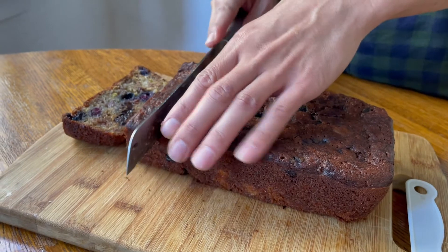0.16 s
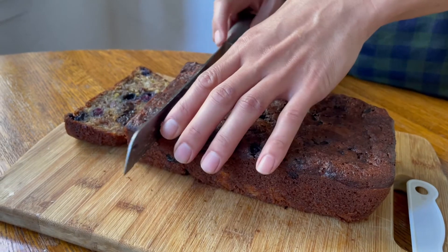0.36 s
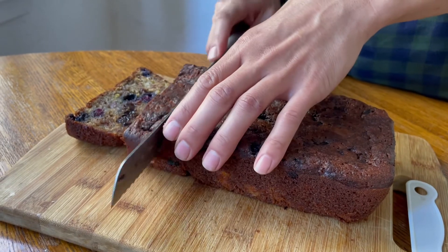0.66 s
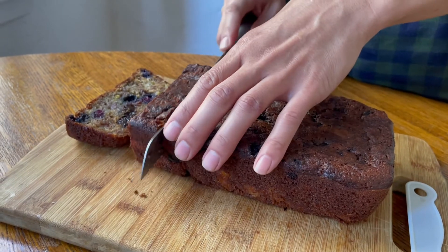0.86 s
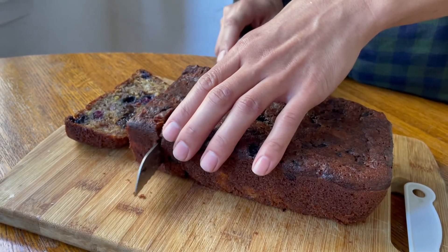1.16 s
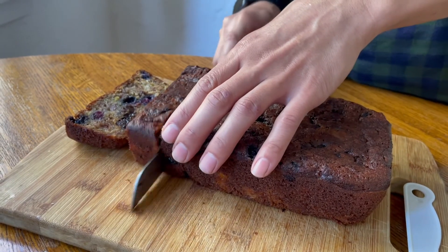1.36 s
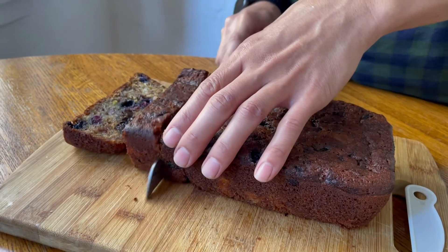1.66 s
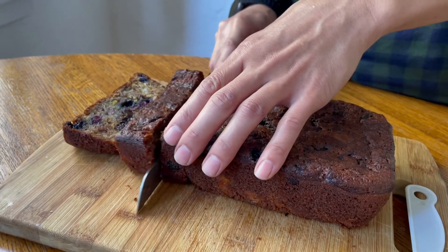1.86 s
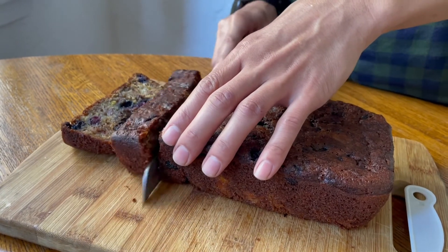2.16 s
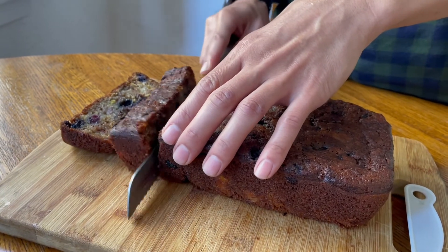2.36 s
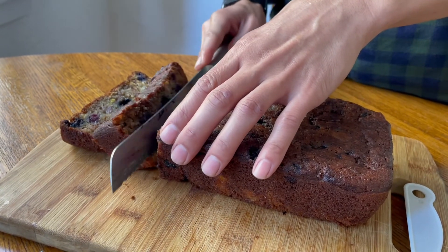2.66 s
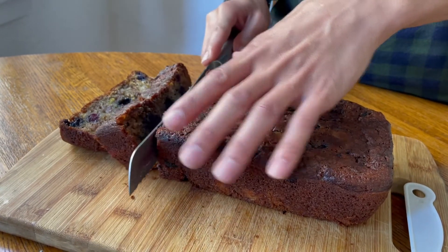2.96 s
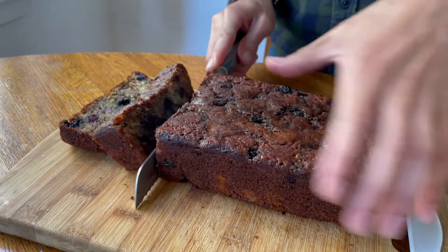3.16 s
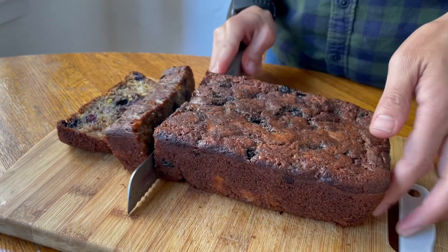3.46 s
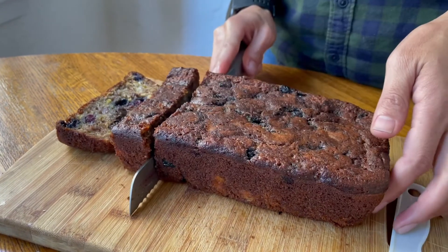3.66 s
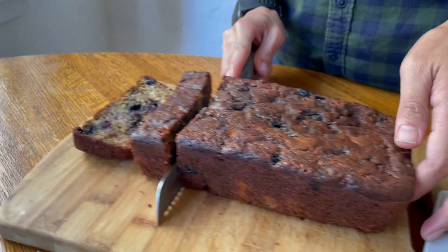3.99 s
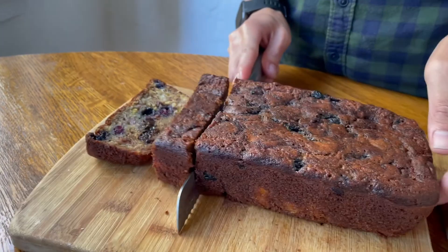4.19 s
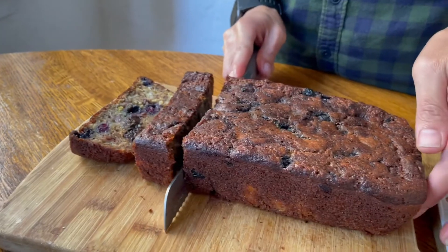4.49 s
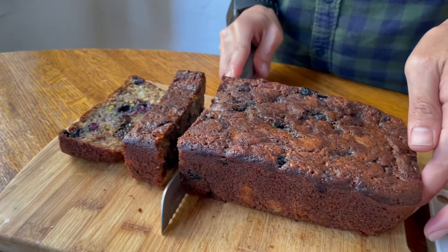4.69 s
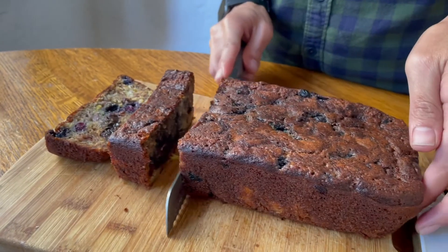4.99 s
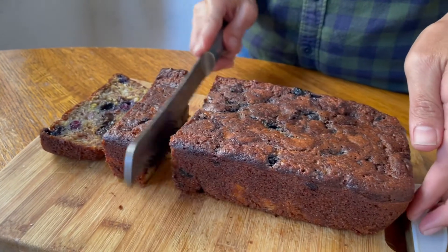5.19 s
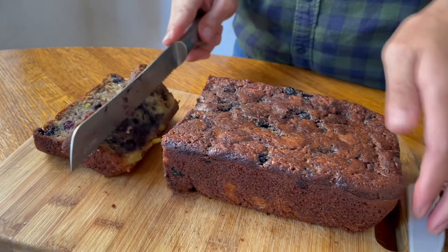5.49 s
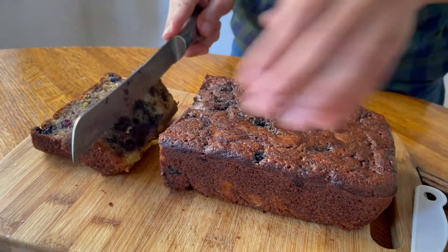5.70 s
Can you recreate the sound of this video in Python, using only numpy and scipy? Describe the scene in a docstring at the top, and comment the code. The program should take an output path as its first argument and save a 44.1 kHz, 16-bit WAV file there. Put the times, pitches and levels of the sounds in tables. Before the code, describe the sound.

Quiet crumbly sawing grows into gritty wood rasps, a brief lull, then a loud knock, juddering board scrapes and small clicks indoors.

```python
"""A serrated knife saws through a moist loaf down to a wooden board, which knocks and is then dragged over a table.
Random slips of teeth and crumbs make hiss and fizz, rasp in the overtones and drum the board modes; a squeal sings.
Knocks ring the board under a thud and a crack; ticks are short wavering rings, bumps low decaying tones.
A slice rocks on the blade, the table rumbles, feedback delays give the room, and air noise and hum lie below."""
import sys
import numpy as np
from scipy import signal
from scipy.fft import rfft, irfft, next_fast_len
from scipy.io import wavfile
from scipy.ndimage import uniform_filter1d

SR = 44100
rng = np.random.default_rng(int(sys.argv[2]) if len(sys.argv) > 2 else 0)


def store_wav(level_fs):
    """Save 16-bit WAV to argv[1]."""
    pcm = np.round(np.clip(np.atleast_2d(level_fs), -1, 1) * 32767)
    wavfile.write(sys.argv[1], SR, pcm.T.astype(np.int16))


N = 257527
PAD = next_fast_len(N + SR)
HZ = np.maximum(np.arange(PAD // 2 + 1) * SR / PAD, 1)   # FFT grid

# Modes of the wooden board. Each row: pitch in Hz, decay t60 in s, then relative levels in dB
# under the knife, when dragged, when knocked, when it judders round.
BOARD = [(197.8, 0.26, -11, -1.5, -24, 4.5), (248.7, 0.22, 4, 3, -0.5, 6.5),
         (291.2, 0.17, -8, -2.5, -11.5, -5.5), (349.65, 0.035, -7.5, 0.5, -6, -11),
         (391, 0.17, -6.5, -8.5, -23.5, -15.5), (422.5, 0.16, -8, -4.5, -4.5, 1),
         (483, 0.062, -7, -17, -7.5, -23), (547, 0.065, 2, -7, -0.5, -6), (562, 0.047, -5.5, -2, 8.5, -4),
         (585, 0.081, -14, -13, -2, -4), (636.6, 0.11, -14.5, -8.5, -5, -0.5),
         (706.5, 0.17, -11, -7.5, -3.5, -8), (767.7, 0.13, -11.5, -5.5, -6.5, -6.5),
         (841.7, 0.13, -13, -8.5, -3, -10.5), (918, 0.09, -25, -13, -6, -19),
         (992, 0.14, -25.5, -9.5, -6, -19.5), (1106, 0.09, -25, -14.5, -2, -15)]


def amp(db):
    """Decibels to gain."""
    return 10 ** (np.asarray(db) / 20)


def rms_one(x):
    """Scale to rms 1."""
    return x / np.sqrt(np.mean(x ** 2) + 1e-20)


def on_hz(points, axis=1):
    """One column of a frequency table, interpolated over log frequency on the FFT grid."""
    table = np.array(points)
    return np.interp(np.log(HZ), np.log(table[:, 0]), table[:, axis])


def shaped(x, response):
    """Filter by a frequency response."""
    return irfft(rfft(x, PAD) * response, PAD)[..., :N]


def drift(rate_hz):
    """Slow random wander of rms 1: low-passed noise on every hundredth sample, joined by lines."""
    pole = np.exp(-200 * np.pi * rate_hz / SR)
    slow = signal.lfilter([1], [1, -pole], rng.standard_normal(N // 100 + 402))[400:]
    return np.interp(np.arange(N) / 100, np.arange(len(slow)), rms_one(slow))


def swells(events, shapes):
    """One gain in time for each level column: every event swells to its peak and sinks again."""
    t = np.arange(N) / SR
    gains = np.full((len(shapes), N), 1e-7)
    for peak_s, rise_s, fall_s, *levels_db in events:
        away = np.where(t < peak_s, (peak_s - t) / rise_s, (t - peak_s) / fall_s)
        near = away < 5
        for gain, level_db, (end_db, blunt) in zip(gains, levels_db, shapes):
            gain[near] += amp(level_db - end_db * away[near] ** blunt)
    return gains


def add(out, s, sound, pan_db):
    """Place a short sound in both channels; positive pan leans left."""
    i = round(s * SR)
    out[:, i:i + len(sound)] += (sound * amp([[pan_db / 2], [-pan_db / 2]]))[:, :N - i]


def mode(hz, t60):
    """Response of a damped mode, t60 at least 1 ms, that a unit click rings at height 1."""
    r = amp(-60 / (max(t60, 1e-3) * SR))
    w = 2 * np.pi * hz / SR
    z = np.exp(-2j * np.pi * HZ / SR)   # delay of one sample
    return np.sin(w) * z / (1 - 2 * r * np.cos(w) * z + r * r * z * z)


def sawing():
    """Knife strokes, light in the crumb, heavy once the teeth reach wood, then the blade eases out."""
    # Each row: peak in s, rise in s, fall in s, then levels in dB of crumb hiss, board drumming,
    # board boom, crumb fizz.
    strokes = [(.02, 0.12, 0.15, -75.5, -102, -70.5, -69.5), (.37, 0.071, 0.041, -74, -97, -78, -68.5),
               (.53, 0.13, 0.11, -79, -117, -78, -68), (.72, 0.14, 0.051, -73, -80.5, -71, -67.5),
               (.875, 0.13, 0.067, -76, -77.5, -83, -71.5), (1.03, 0.13, 0.057, -73, -77, -73, -73.5),
               (1.14, 0.068, 0.36, -74, -71, -69.5, -69), (1.295, 0.045, 0.096, -62, -42.5, -45.5, -58.5),
               (1.425, 0.046, 0.11, -62, -44.5, -50, -71), (1.545, 0.05, 0.058, -61, -50.5, -76, -70),
               (1.615, 0.09, 0.039, -57.5, -44.5, -50.5, -61.5),
               (1.74, 0.11, 0.078, -56.5, -39, -48, -64.5), (1.915, 0.11, 0.086, -55, -40.5, -43.5, -59.5),
               (2.04, 0.072, 0.097, -56.5, -47, -47, -66), (2.115, 0.18, 0.12, -68, -54, -58.5, -67),
               (2.41, 0.086, 0.1, -99, -100, -77, -74.5), (2.56, 0.052, 0.25, -99, -100, -79.5, -90),
               (2.77, 0.14, 0.071, -97, -86, -74, -77.5)]
    # Swell of hiss, drumming, boom, fizz. Each row: dB lost one rise or fall from the peak,
    # bluntness (low is pointed, high is flat-topped).
    stroke_shape = [(26.8, 1.94), (24.9, 1.04), (21.5, 0.94), (23, 1.5)]
    # Colour of the hiss. Each row: frequency in Hz, relative level in dB per Hz.
    hiss = [(1500, -4), (3000, -5.5), (4200, 0.5), (5500, 0), (7000, 1.5), (8500, -27), (11000, -16.5)]
    # In between the whole edge lies on the board and the blade rings along: start, end in s.
    flat_s = (1.5, 2.09)
    boom_lag_s = 0.029   # the boom builds up after the drumming
    tip, knife = (2, 5), (2, 2)   # level columns of the board and rasp tables

    gains = swells(strokes, stroke_shape)
    gains[2] = np.roll(gains[2], round(boom_lag_s * SR))
    flat = (np.arange(N) > flat_s[0] * SR) & (np.arange(N) < flat_s[1] * SR)
    saw = friction(gains * ~flat, hiss, tip, rasp_db=3.5, hiss_per_s=5000, drum_per_s=970,
                   spread_db=0.0, catch_db=1.0)
    saw += friction(gains * flat, hiss, knife, rasp_db=4.0, hiss_per_s=5400, drum_per_s=1100,
                    spread_db=1.5, catch_db=1.0)
    return saw, gains


def dragging():
    """Shoves of board and loaf over the table; for a while the board judders round."""
    # Each row: peak in s, rise in s, fall in s, then levels in dB of hiss, drumming, boom, fizz.
    shoves = [(3.086, 0.015, 0.11, -61, -36, -34.5, -65), (3.24, 0.031, 0.092, -56, -49.5, -51.5, -58.5),
              (3.38, 0.025, 0.056, -58, -66.5, -70, -54), (3.585, 0.0099, .04, -75, -83.5, -86, -83),
              (3.62, 0.015, 0.04, -70.5, -88, -84, -75), (3.65, .01, 0.031, -80.5, -80, -85, -90),
              (3.681, .006, .04, -63, -78, -93, -78), (3.731, 0.038, 0.06, -55.5, -68, -95, -61.5),
              (3.79, .03, 0.091, -70.5, -67, -70.5, -74), (3.841, 0.07, 0.3, -64, -56.5, -59, -75),
              (3.896, 0.012, 0.075, -64, -61.5, -53, -73), (3.977, 0.012, 0.088, -57.5, -70, -42, -69),
              (4.036, 0.11, 0.072, -71.5, -45.5, -43.5, -80), (4.154, 0.024, 0.053, -50.5, -78, -78, -58),
              (4.296, 0.013, 0.13, -77, -96, -52.5, -81), (4.372, 0.016, 0.064, -68, -48.5, -40, -73),
              (4.436, 0.0048, 0.048, -64, -47.5, -55.5, -71), (4.483, 0.03, 0.067, -70.5, -57, -44, -72),
              (4.621, 0.014, 0.17, -68, -50.5, -49.5, -72.5), (4.657, 0.036, 0.026, -84, -55, -51, -76),
              (4.702, 0.024, 0.073, -61.5, -60.5, -56.5, -70), (4.755, 0.04, 0.046, -64.5, -35, -36.5, -67),
              (4.85, 0.02, 0.068, -81, -64.5, -47.5, -71), (5.002, 0.14, 0.058, -79, -90, -68, -63.5),
              (5.16, 0.019, 0.37, -102.5, -105.5, -76.5, -78.5),
              (5.378, 0.0053, 0.073, -66.5, -60, -82, -67), (5.432, 0.044, 0.055, -66.5, -71.5, -70, -66.5),
              (5.539, 0.1, 0.12, -87, -58, -49.5, -101), (5.641, 0.04, 0.074, -92, -58.5, -63, -86),
              (5.731, 0.064, 0.13, -89, -61.5, -60.5, -101)]
    # Swell of hiss, drumming, boom, fizz. Each row: dB lost one rise or fall from the peak,
    # bluntness (low is pointed, high is flat-topped).
    shove_shape = [(16, 1.3), (16, 1.37), (16, 0.87), (18, 1.3)]
    # Colour of the hiss. Each row: frequency in Hz, relative level in dB per Hz.
    hiss = [(1500, -2), (3000, 8), (4200, 6), (5500, 3), (7000, 2), (8500, -19), (11000, -19)]
    # Shoves that peak in this span judder the board round: start, end in s.
    judder_s = (4.35, 5.3)
    pull, judder = (3, 3), (5, 4)   # level columns of the board and rasp tables

    turning = [judder_s[0] < row[0] < judder_s[1] for row in shoves]
    pulled = swells([row for row, turn in zip(shoves, turning) if not turn], shove_shape)
    turned = swells([row for row, turn in zip(shoves, turning) if turn], shove_shape)
    drag = friction(pulled, hiss, pull, rasp_db=2.5, hiss_per_s=2000, drum_per_s=500,
                    spread_db=0.5, catch_db=1.5)
    drag += friction(turned, hiss, judder, rasp_db=2.0, hiss_per_s=1200, drum_per_s=780,
                     spread_db=1.5, catch_db=2.0)
    return drag, pulled + turned


def friction(gains, hiss, place, rasp_db, hiss_per_s, drum_per_s, spread_db, catch_db):
    """Slips of teeth and crumbs hiss, rasp in the overtones and drum the board."""
    # Blade and board overtones. Each row: pitch in Hz, width in Hz, then relative levels in dB
    # under the knife, when dragged, when the board judders round, under the tip.
    overtone_rows = [(1091, 100, -1, -0.5, -5.5, -5), (1338, 87, 5, -9.5, -20.5, -3),
                     (1528, 160, -11, -1, 1.5, -2.5), (1940, 420, 4.5, -1, -17.5, -2.5),
                     (2360, 140, -6, 0.5, -10.5, -6.5), (2680, 170, 6.5, -5, -10, -4.5),
                     (3220, 250, -13, -7, -30.5, -9), (3470, 2300, 3, -10.5, -30, 0),
                     (4110, 300, -3, -7.5, -29.5, -11), (4600, 90, -16, -17.5, -27, -21.5),
                     (5010, 90, -6, -14.5, -29, -16.5), (5300, 350, -8, -15, -29, -11.5),
                     (5780, 80, -5.5, -19.5, -28, -17), (6200, 90, -13, -16.5, -29, -19.5)]
    boom_split_hz = 350   # board modes below it boom, those above drum
    wood_share = 0.46   # the rasp lies between hiss and drumming
    catch_hz = 35   # the teeth catch unevenly
    drum_spread_db = 1.77

    hiss_gain, drum_gain, boom_gain = gains[:3]
    rasp_gain = amp(rasp_db) * hiss_gain ** (1 - wood_share) * drum_gain ** wood_share
    board = [(m[0], m[1], m[place[0]]) for m in BOARD]
    drum_modes = [m for m in board if m[0] >= boom_split_hz]
    boom_modes = [m for m in board if m[0] < boom_split_hz]
    rasp_modes = [(m[0], np.log(1000) / np.pi / m[1], m[place[1]]) for m in overtone_rows]   # width to t60

    fine = amp(catch_db * drift(catch_hz)) * grains(hiss_per_s, spread_db)
    coarse = grains(drum_per_s, drum_spread_db)
    out = hiss_gain * rms_one(shaped(fine, amp(on_hz(hiss))))
    out += rasp_gain * body(fine, rasp_modes, wander_db=4)   # the rasp jumps from overtone to overtone
    out += drum_gain * body(coarse, drum_modes, wander_db=2.6)
    return out + boom_gain * body(coarse, boom_modes, wander_db=3.5)


def grains(per_s, spread_db):
    """Random slips of uneven size and sign."""
    sizes = amp(spread_db * np.minimum(rng.exponential(1, N), 5)) * rng.choice([-1, 1], N)
    return sizes * (rng.random(N) < per_s / SR)


def body(slips, modes, wander_db, wander_hz=8):
    """Slips ring modes of (Hz, t60 s, dB); as the contact point moves, each mode comes and goes."""
    level = amp(np.array(modes)[:, 2:])
    shares = level * amp([wander_db * drift(wander_hz) for _ in modes])
    shares = shares / np.sqrt((shares ** 2).sum(axis=0))   # the summed power of the shares stays even
    out = np.zeros(N)
    push = rng.choice([-1, 1], N)     # each slip pushes every mode its own way
    for k, ((hz, t60, _), share) in enumerate(zip(modes, shares)):
        r = amp(-60 / (t60 * SR))
        w = 2 * np.pi * hz / SR
        kicks = slips * share * np.roll(push, k * 997) + 1e-18
        ring = signal.lfilter([0, np.sin(w)], [1, -2 * r * np.cos(w), r * r], kicks)
        out += ring / np.sqrt(t60)   # long modes gather more slips
    return rms_one(out)


def fizz(gain, per_s=5000, spread_db=4.0):
    """Dense tiny crumb grains above the hiss."""
    # Each row: frequency in Hz, relative level in dB per Hz.
    colour = [(6000, -10), (8000, -2), (10000, -2), (13000, -12), (15000, -1), (16800, -22.5)]
    return gain * rms_one(shaped(grains(per_s, spread_db), amp(on_hz(colour))))


def squeal():
    """One blade mode sings faintly on some strokes, wavering a little in pitch and strength."""
    # Each row: peak in s, rise in s, fall in s, level in dB.
    songs = [(.375, .05, .06, -84), (1.335, .035, .035, -72), (1.612, .06, .05, -64),
             (1.93, .045, .045, -66), (2.068, .04, .045, -68)]
    hz = 5510 + 12 * drift(12)
    tone = np.sqrt(2) * amp(2.5 * drift(25)) * np.sin(2 * np.pi * np.cumsum(hz) / SR)
    return swells(songs, [(9.6, 6.9)])[0] * tone


def knocks(crack_t60=0.047, thud_t60=0.0022, narrow_db=6, rattle_db=-14):
    """A first contact and a short rattle drive the board modes near the favoured pitch, under a thud and a crack."""
    # Each row: start in s, peak of the ring in dB, thud in dB before its filter, overtones in dB
    # against the board modes, crack in dB before its filters, favoured pitch in Hz, rattle t60 in s,
    # ring length as a multiple of the mode decay, pan in dB left over right.
    blows = [(.882, -60, -71, 6, -84, 1130, 0.064, 1.1, 4), (1.035, -59, -65, 3, -84, 980, 0.034, 1.1, 3),
             (1.126, -54.5, -56, -16, -61, 910, .02, 1.1, 6),
             (1.2766, -30, -11.5, 9.5, -60, 610, 0.012, .9, 2),
             (1.410, -40, -24, 17, -62, 406, 0.016, 1.1, 8),
             (3.0709, -14.5, -9.5, 14, -34, 582, 0.0022, .6, 1.5),
             (3.0853, -24, -28, 12, -52.5, 660, 0.02, .9, -8),
             (3.0976, -24.5, -26, 5.5, -60.5, 301, 0.015, .7, 0.5),
             (3.122, -29.5, -40, 1.5, -69, 563, 0.024, 1.1, -3),
             (3.957, -29.5, -39, -13, -66.5, 326, 0.011, 1.1, -1.5),
             (4.0009, -15, -27, -5, -44.5, 839, 0.024, 1.3, -3.5),
             (4.046, -30, -34, -5, -69, 820, 0.03, 2.6, -3.5),
             (4.287, -51.5, -70, 6.5, -90, 702, 0.0064, 1.1, -8.5),
             (4.359, -43.5, -55, 18, -60.5, 361.4, 0.02, 1.1, -3),
             (4.43, -60, -33, -4, -58, 1138, 0.015, 1.1, 2),
             (4.479, -71, -34, -6, -57.5, 1056, 0.009, 1.1, 3.5),
             (4.614, -56, -59, -8, -78, 590, 0.024, 1.1, -5),
             (5.04, -53.5, -40.5, 2.5, -59, 1083, 0.0082, 1.1, 0),
             (5.443, -42, -32, -12, -78, 700, 0.062, .9, -6.5),
             (5.505, -43, -42, -2, -93, 616, 0.022, .9, -11)]
    # Overtones that only a blow wakes. Each row: pitch in Hz, t60 in s, relative level in dB.
    overtones = [(1360, 0.057, -14), (1455, 0.021, -11.5), (1610, 0.047, -5), (1640, 0.05, -5.5),
                 (1708, 0.024, -5.5), (1824, 0.043, -1.5), (1950, 0.03, -3), (2070, 0.12, -4),
                 (2290, 0.043, 0), (2840, 0.089, -8.5), (3424, .03, 7)]
    spread_db = 3   # each blow wakes the modes unevenly

    out, t = np.zeros((2, N)), np.arange(SR // 2) / SR
    short = t[:SR // 10]
    hz, t60, level_db = np.vstack([np.array(BOARD)[:, [0, 1, 4]], overtones]).T
    high = np.arange(len(hz)) >= len(BOARD)
    signs = (-1) ** (np.arange(len(hz)) // 2)
    waves = np.sin(2 * np.pi * hz * t[:, None])
    chance = rng.standard_normal((len(blows), len(hz)))
    for row, own in zip(blows, chance):
        s, ring_db, thud_db, high_db, crack_db, favoured_hz, rattle_t60, length, pan_db = row
        off_pitch_db = narrow_db * np.log2(hz / favoured_hz) ** 2
        strength = signs * amp(level_db + high * high_db + spread_db * own - off_pitch_db)
        ring = (waves * amp(-60 * t[:, None] / (t60 * length))) @ strength
        noise = rng.standard_normal((2, len(short)))
        contacts = noise[0] * amp(rattle_db - 60 * short / rattle_t60)
        contacts[0] = 1   # first contact
        ring = signal.fftconvolve(ring, contacts)
        thud = np.sin(2 * np.pi * 0.82 * favoured_hz * short) * amp(thud_db - 60 * short / thud_t60)
        thud = signal.lfilter([1, -1], [1, -.965], thud)     # the thud carries no deep bass
        crack = np.diff(noise[1], prepend=0) * amp(crack_db - 60 * short / crack_t60)
        crack = signal.lfilter([.8], [1, -1.2, .4], crack)     # wood dulls the top of the crack
        add(out, s, amp(ring_db) * ring / np.abs(ring).max(), pan_db)
        add(out, s, thud + crack, pan_db)
    return out


def ticks(swell_s=0.0015, ring_db=-3, bright_hz=3500, top_hz=11500):
    """Bursts that swell for a moment: a wavering ring at the pitch of the piece that snaps, plus bright noise."""
    # Ticks of blade, plastic and crumbs. Each row: start in s, overall level in dB, ring pitch in Hz,
    # bright noise in dB before its filter, pan in dB left over right.
    pieces = [(0.0884, -63, 5800, -1, 4), (0.792, -56, 10900, -8, 0), (1.078, -58, 3050, -15, 3),
              (1.181, -59, 2280, -14, 14), (1.3925, -41, 2280, -22, 0), (2.279, -66, 5900, 1, -6),
              (2.3687, -55.5, 6410, -7, 3), (2.426, -60.5, 5000, -10, -8), (2.527, -60.5, 6000, -7, 1.5),
              (2.5514, -59, 12100, -23, 2), (2.577, -62, 11440, -36, -5), (2.698, -67, 9600, -30, -14),
              (2.798, -54.5, 7700, -10, 1), (3.2117, -21, 2423, -64, 1), (3.222, -35, 2210, -24, -25),
              (3.2268, -20, 3626, -3.5, 2), (3.6178, -51.5, 2476, -25, 1), (3.652, -57, 1603, -17, -7),
              (3.678, -48.5, 2440, -23, 1), (3.6945, -43, 2255, -33, 7), (3.7245, -42, 2400, -41, -9),
              (3.7682, -23, 3530, -14.5, 2), (3.8586, -60, 2025, -24.5, 18), (3.893, -39, 2330, -14.5, 8),
              (4.246, -54.5, 2260, -16, 4), (4.4974, -53, 2620, -16, 0), (4.507, -51.5, 4520, -5, 3),
              (4.6893, -57, 2270, -35.5, 8), (4.744, -41.5, 2466, -8, 4), (4.763, -46, 2550, -24, -1),
              (4.955, -59, 6670, -20, 7), (4.9658, -59, 5900, -2, 9), (4.979, -42, 10560, -29.5, 0.5),
              (5.374, -54, 2540, -11, 9), (5.3858, -48, 6360, -13, 1), (5.4141, -42.5, 4290, -16, 3)]
    t60_s, loud_t60_s, loud_db = 0.01, 0.014, -22.5   # the big pieces ring longer

    out, t = np.zeros((2, N)), np.arange(SR // 25) / SR
    rows = pieces + stray_crumbs()
    noise = rng.standard_normal((len(rows), 2, len(t)))
    band = signal.butter(2, [bright_hz, top_hz], "band", fs=SR, output="sos")
    bright = signal.sosfilt(band, noise[:, 0])
    for (s, level_db, hz, bright_db, pan_db), hiss, waver in zip(rows, bright, noise[:, 1]):
        t60 = loud_t60_s if level_db > loud_db else t60_s
        ring = np.sin(2 * np.pi * hz * t + 0.39 * np.cumsum(waver))   # the phase wanders at random
        tick = amp(ring_db) * ring + amp(bright_db) * hiss
        shape = np.where(t < swell_s, (t / swell_s) ** 3, amp(-60 * (t - swell_s) / t60))
        add(out, s, amp(level_db) * tick * shape, pan_db)
    return out


def stray_crumbs(count=14, level_db=-68, spread_db=4):
    """Rows of faint ticks, as stray crumbs drop at random moments and pitches."""
    when, pitch, size, side = rng.random((count, 4)).T
    levels_db = level_db + spread_db * (2 * size - 1)
    pitches_hz = 2000 * 5 ** pitch
    return list(zip(when * N / SR, levels_db, pitches_hz, np.full(count, -9), 8 * side - 4))


def rocking(touch_t60=0.053, pan_db=3, count=8):
    """The fallen slice rocks against the blade, quicker and softer: puffs of noise into the blade modes."""
    # Each row: pitch in Hz, relative level in dB, t60 in s.
    blade_modes = [(1175, 5, 0.016), (1890, -0.5, 0.014), (2530, -5.5, 0.021), (3040, -9, 0.0082),
                   (3560, -6, 0.015), (4230, -3, 0.0035), (5200, -10, 0.0043), (7200, 0.5, 0.00089)]
    start_s, period_s, quicken_s = 5.49, .0497, .0005   # each gap is twice quicken_s shorter than the last
    puff_db, loss_db = -73, 1.54   # level into the modes, loss at each touch

    out, t = np.zeros((2, N)), np.arange(SR // 20) / SR
    for k, puff in enumerate(rng.standard_normal((count, len(t)))):
        s = start_s + k * (period_s - k * quicken_s)
        add(out, s, amp(puff_db - k * loss_db) * puff * amp(-60 * t / touch_t60), pan_db)
    return shaped(out, sum(amp(db) * mode(hz, t60) for hz, db, t60 in blade_modes))


def bumps(rise_s=0.0075):
    """The table top sways after a push, in low tones that rise fast and die away."""
    # Each row: start in s, level in dB before rise and decay, pitch in Hz, t60 in s.
    pushes = [(0.722, -52.5, 118, 0.16), (3.317, -35, 122.5, 0.19), (1.409, -32.5, 117, 0.11),
              (3.234, -21.5, 118, 0.091), (4.002, -20, 128, 0.064), (5.446, -31.5, 93.6, 0.12),
              (5.519, -37, 82, 0.15)]
    out, t = np.zeros((2, N)), np.arange(SR // 2) / SR
    for s, level_db, hz, t60 in pushes:
        shape = amp(level_db - 60 * t / t60) * (1 - np.exp(-t / rise_s))
        add(out, s, shape * np.sin(2 * np.pi * hz * t), 0)
    return out


def rumble(boom_gain, waver_hz=4):
    """The table never quite rests under the hands and shakes with every boom of the board."""
    # Each row: frequency in Hz, relative level in dB per Hz.
    colour = [(30, -3.5), (55, 6.5), (85, 6.5), (120, 13), (160, 5), (220, -31.5)]
    rest_db, waver_db, below_boom_db = -67.5, -1.5, -18.5
    gain = amp(rest_db + waver_db * drift(waver_hz)) + amp(below_boom_db) * boom_gain
    gain = uniform_filter1d(gain, size=SR // 25)     # the heavy table cannot start at once
    return gain * rms_one(shaped(rng.standard_normal(N), amp(on_hz(colour))))


def diffuse(mid, side):
    """Left and right from two unrelated signals, nearly alike in the bass."""
    # Each row: frequency in Hz, side against mid in dB.
    width = [(100, -10), (250, -6.5), (350, -4), (1000, 0), (2000, 4.5), (4000, 7), (7000, 1),
             (14000, -17.5)]
    side = shaped(side, amp(on_hz(width)))
    return np.array([mid + side, mid - side])


def room(x):
    """Two sets of twelve feedback delays whose loss follows the decay table."""
    # Each row: frequency in Hz, t60 in s.
    decay = [(100, 0.41), (500, 0.46), (3000, 0.2), (12000, 0.027)]
    tails = []
    for lags_s in rng.uniform(.02, .065, (2, 12)):
        loops = [amp(-60 * d / on_hz(decay)) * np.exp(-2j * np.pi * HZ * d) for d in lags_s]
        echoes = sum((-1) ** k * g / (1 - g) for k, g in enumerate(loops))
        tails.append(shaped(x, echoes / np.sqrt(12)))
    return diffuse(*tails)


def room_tone():
    """Steady air noise and mains hum."""
    # Colour of the air. Each row: frequency in Hz, relative level in dB per Hz.
    air_colour = [(15, -37.5), (30, 1.5), (60, 5.5), (121, -5.5), (172, -7), (240, -9), (400, -20),
                  (700, -25), (1200, -31.5), (3000, -46.5), (6000, -44.5), (11000, -57.5), (14000, -45),
                  (16500, -69.5)]
    # Mains lines. Each row: pitch in Hz, level in dB rms.
    hum_lines = [(60, -70.5), (119, -78.5)]
    air = rms_one(shaped(diffuse(*rng.standard_normal((2, N))), amp(on_hz(air_colour))))
    t = np.arange(N) / SR
    hum = sum(amp(db) * np.sqrt(2) * np.sin(2 * np.pi * hz * t) for hz, db in hum_lines)
    return amp(-66) * air + hum


def ports(sound):
    """Two microphone ports differ in level and by a phase shift that grows in the treble."""
    # Each row: frequency in Hz, phase in radians by which the left leads, left over right in dB.
    port_rows = [(100, 0, 0), (260, -.15, 0), (430, -.9, -1), (540, -.55, -3), (650, -.4, -2),
                 (730, .5, -1), (820, 1.2, 0), (950, -.6, -1), (1150, -.2, 0), (1300, .4, 1), (1900, .5, 1),
                 (2400, 0, 2), (2900, .2, 4), (3700, -.3, 3), (5600, .3, 2), (7000, -1.3, 0),
                 (8300, -np.pi, 0), (11400, -2 * np.pi, 0), (15000, -3 * np.pi, 0), (17000, -11, 0)]
    half = amp(on_hz(port_rows, axis=2) / 2) * np.exp(.5j * on_hz(port_rows))
    return shaped(sound, np.array([half, 1 / half]))


def scene():
    """Friction and blows, heard directly and through the room, over the room tone."""
    saw, saw_gains = sawing()
    drag, drag_gains = dragging()
    *_, boom_gain, fizz_gain = saw_gains + drag_gains
    direct = saw + drag + squeal() + rumble(boom_gain) + fizz(fizz_gain)
    direct = direct + knocks() + ticks() + rocking() + bumps()
    reverb = amp(-4.5) * room(direct.mean(axis=0))
    return ports(direct + reverb + room_tone())


def record(dry):
    """The microphone loses the deepest bass; the top is cut."""
    dry = signal.sosfilt(signal.butter(2, 30, "high", fs=SR, output="sos"), dry)
    return signal.sosfilt(signal.cheby2(24, 70, 16800, fs=SR, output="sos"), dry)


dry = scene()
out = record(dry)
store_wav(out)
```